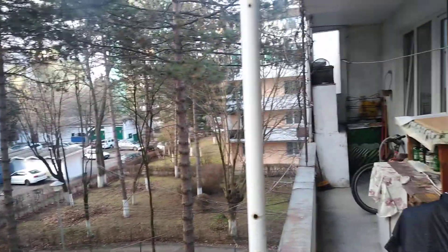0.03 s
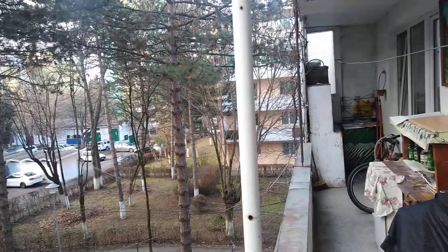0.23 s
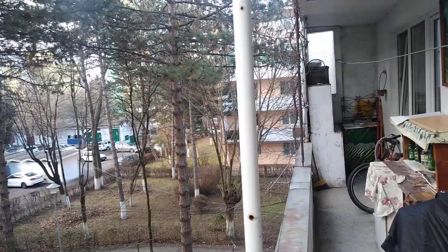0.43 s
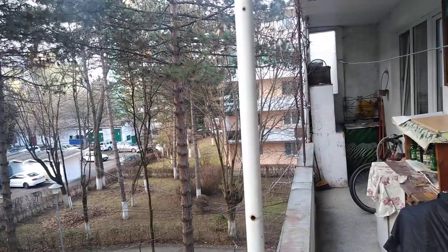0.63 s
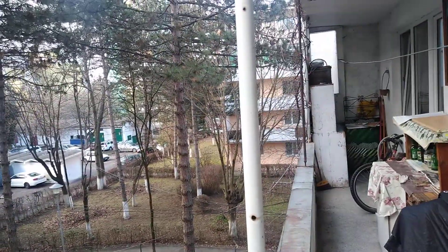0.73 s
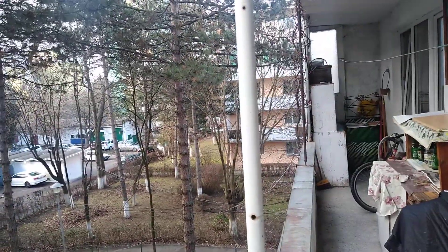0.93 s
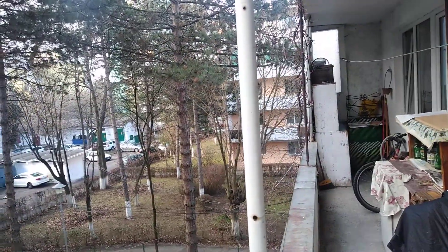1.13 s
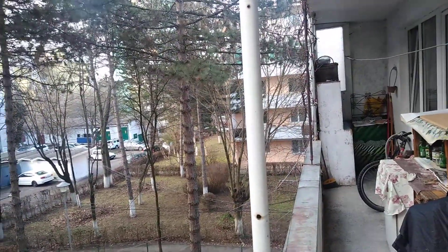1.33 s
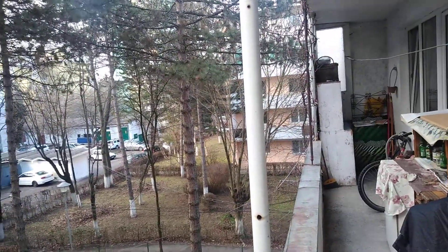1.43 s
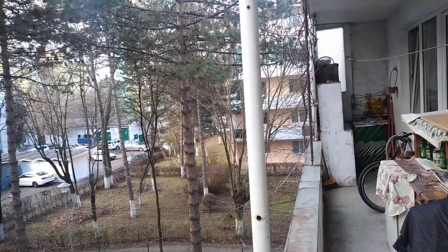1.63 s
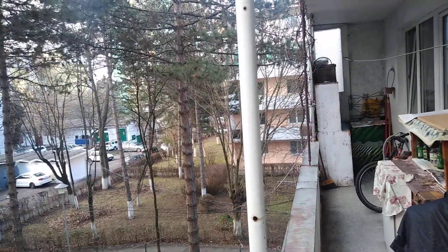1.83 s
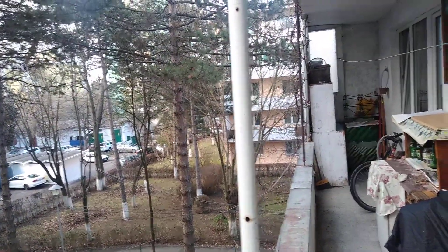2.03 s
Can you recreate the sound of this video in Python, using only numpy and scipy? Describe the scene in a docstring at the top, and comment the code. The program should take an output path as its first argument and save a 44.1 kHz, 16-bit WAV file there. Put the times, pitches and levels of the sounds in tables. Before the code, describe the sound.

Strong wind rushes through pines beside a balcony, with a faint, wavering moan underneath. Gusts bump the microphone with low thumps, and near the end a harder one hits with rumbling and sharp slaps.

```python
"""Strong wind rushes through pines beside a balcony, with a faint, wavering moan.
The rush is broadband turbulence noise; the moan is a narrow resonance that follows the air speed.
Eddies buffet the microphone with low thumps and sharp slaps, opposite in polarity in the two channels.
The hardest gust makes the recorder's limiter turn the gain down, and it recovers slowly."""
import sys
import numpy as np
from scipy import signal
from scipy.fft import rfft, irfft
from scipy.io import wavfile
from scipy.ndimage import uniform_filter1d

SR = 44100
rng = np.random.default_rng(int(sys.argv[2]) if len(sys.argv) > 2 else 0)


def int16_out(signal):
    """Quantize to a 16-bit WAV file."""
    q = np.round(np.clip(np.atleast_2d(signal).T, -1, 1) * 32767)
    wavfile.write(sys.argv[1], SR, q.astype(np.int16))


N = 92610
TIME = np.arange(N) / SR
HZ = np.fft.rfftfreq(N, 1 / SR)


def amp(db):
    """Amplitude ratio of a level in decibels."""
    return 10 ** (np.asarray(db) / 20)


def unit(x):
    """Normalisation to an rms of one."""
    return x / np.sqrt(np.mean(x ** 2) + 1e-20)


def at_frequency(points, hz):
    """Interpolation of a table on a logarithmic frequency axis."""
    points_hz, values = np.transpose(points)
    return np.interp(np.log(hz + 1), np.log(points_hz + 1), values)


def band_noise(low_hz, high_hz, order=4):
    """White noise shaped by a Butterworth band-pass magnitude response."""
    low_loss = 1 + (low_hz / (HZ + 1e-3)) ** (2 * order)
    high_loss = 1 + (HZ / high_hz) ** (2 * order)
    return unit(irfft(rfft(rng.standard_normal(N)) / np.sqrt(low_loss * high_loss), N))


def pine_rush(level_db=-38.5, roar_hz=404, needles_hz=1510, comb_hz=2140, patch_db=0.5, flutter_db=0.15):
    """Turbulence in the trees radiates broadband noise, only partly coherent at two close ports."""
    # spectrum of the rush: frequency_hz, relative_density_db
    spectrum = [(20, -47), (60, -16), (130, -1), (200, -3), (270, -2), (400, -3.5), (520, -4.5), (750, -5),
                (1000, -8.5), (1300, -10.5), (1800, -10), (2400, -13), (3000, -18.5), (3600, -24),
                (4300, -27.5), (5000, -27), (6500, -32), (8000, -33.5), (10000, -38), (12000, -43.5),
                (14000, -48.5)]
    # strength of the wind in the needles: time_s, gain_db
    wind = [(0, -0.6), (.3, 0.5), (.6, 0.1), (.9, 1), (1.2, 2.1), (1.5, 3), (1.65, 3.2), (1.83, 1),
            (2.1, 2.5)]
    # strength of the low roar: time_s, gain_db
    roar = [(0, -.5), (.55, 0.6), (1.0, 0.7), (1.5, 0.5), (1.88, 1.5), (2.1, -4.5)]
    # likeness of the channels: frequency_hz, coherence_ratio
    likeness = [(50, 0), (150, 0), (290, .7), (400, 0.35), (500, 0.66), (620, 0.81), (850, 0.85),
                (1100, 0.94), (1400, 0.52), (1700, 0.65), (2080, 0.98), (2750, 0.74), (3200, 0.74),
                (3700, 0.6), (4300, 1), (4600, 0.2), (5300, 0.27), (6000, 0.52), (9000, .28), (14000, .2)]
    # phase lead of the left channel in the low range: frequency_hz, lead_rad
    low_lead = [(50, 4.5), (180, 2), (280, -0.57), (400, -0.66), (580, 0.35), (800, -0.3), (1250, -0.55),
                (1500, 1.98), (2140, 3)]
    # balance of the channels: frequency_hz, left_minus_right_db
    balance = [(100, -9), (330, -0.5), (500, 0), (1000, 0.2), (1350, 2), (2100, 1.5), (2500, 2.5),
               (3800, 0.5), (6000, 2.5), (9000, 1), (13000, -1)]
    window, hop = 1024, 256
    frames, hz = N // hop + 5, np.fft.rfftfreq(window, 1 / SR)
    frame_s = np.arange(frames) * hop / SR
    left_re, left_im, other_re, other_im, patches = rng.standard_normal((5, frames, len(hz)))
    patches = uniform_filter1d(patches, size=14, axis=0)  # smooth in time
    patches = unit(uniform_filter1d(patches, size=12, axis=1))  # and in frequency
    flutter = unit(uniform_filter1d(rng.standard_normal(frames), size=8))[:, None]
    wind_db = np.interp(frame_s, *np.transpose(wind))[:, None]
    roar_db = np.interp(frame_s, *np.transpose(roar))[:, None]
    # the treble follows the wind, so the rush brightens as the wind grows
    swell_db = roar_db + (wind_db - roar_db) * at_frequency([(roar_hz, 0), (needles_hz, 1)], hz)
    magnitude = amp(at_frequency(spectrum, hz) + swell_db + patch_db * patches + flutter_db * flutter)
    coherence = np.clip(at_frequency(likeness, hz), 0, 1)
    high_lead = np.pi + 2 * np.pi * hz / comb_hz
    lead = np.where(hz < low_lead[-1][0], at_frequency(low_lead, hz), high_lead)
    left = left_re + 1j * left_im
    right = coherence * left + np.sqrt(1 - coherence ** 2) * (other_re + 1j * other_im)
    lean = amp(at_frequency(balance, hz) / 2)
    spectra = np.array([left * lean, right * np.exp(-1j * lead) / lean]) * magnitude
    _, rush = signal.istft(spectra.swapaxes(1, 2), nperseg=window, noverlap=window - hop)
    return amp(level_db) * unit(rush[:, :N])


def balcony_moan(width_hz=34, steadiness=0.88, lead_rad=-0.16):
    """A flow-driven resonance gives a narrow band of noise whose pitch wanders with the air speed."""
    # course of the moan: time_s, pitch_hz, level_db
    course = [(0, 387.7, -42.5), (0.061, 368.9, -45.5), (0.121, 329, -42.5), (.175, 333.4, -47),
              (.22, 342.5, -43), (.3, 347, -43.5), (.4, 330.3, -52), (.46, 341.3, -42),
              (0.531, 299.4, -46.5), (.6, 324.8, -52.5), (.67, 307.6, -41.5), (.735, 300, -54),
              (.81, 317.2, -42), (.9, 325.7, -51.5), (1.11, 328, -42.5), (1.23, 315, -49.5),
              (1.31, 338, -47), (1.462, 298, -49), (1.901, 323.3, -55), (2.1, 310, -44.5)]
    time_s, pitch_hz, level_db = np.transpose(course)
    phase = 2 * np.pi * np.cumsum(np.interp(TIME, time_s, pitch_hz)) / SR
    envelope = band_noise(0.9, width_hz / 2, order=2) + 1j * band_noise(0.97, width_hz / 2, order=2)
    tone = envelope / np.sqrt(1 + (steadiness * abs(envelope)) ** 2) * np.exp(1j * phase)
    stereo = np.array([tone, tone * np.exp(-1j * lead_rad)]).real
    return amp(np.interp(TIME, time_s, level_db)) * unit(stereo)


def buffeting(full_force_db=-4, calm_swing_db=2, evenness=3):
    """Eddies on the microphone add in power; the harder or smaller one is, the higher its rumble reaches."""
    # light turbulence between the eddies: time_s, level_db
    calm_levels = [(0, -44), (.5, -44), (1.0, -41), (1.16, -48), (1.22, -65), (1.33, -53), (1.4, -42),
                   (1.53, -52), (1.9, -30), (2.1, -36.5)]
    # eddies, the small ones lifting the upper rumble: peak_s, rise_s, fall_s, level_db, lift_db
    eddies = [(.103, 0.014, 0.011, -36.5, 5), (.211, 0.012, 0.018, -29.5, 6.5),
              (0.255, 0.0096, 0.0085, -21, 1.5), (.352, 0.029, 0.023, -31.5, 3.5),
              (0.404, 0.0067, 0.016, -20, -5), (.658, 0.013, .02, -18, -8), (0.704, 0.011, 0.013, -18, 0),
              (0.746, 0.0099, 0.013, -23.5, -5), (.822, 0.0078, 0.015, -30, 8.5),
              (.934, 0.0051, 0.012, -26, 2), (.972, 0.0098, 0.02, -32.5, 2), (1.164, 0.015, 0.012, -37, 12),
              (1.366, 0.0062, 0.0099, -27.5, -4), (1.447, .013, .013, -29.5, -4),
              (1.564, 0.0059, .006, -16, 0), (1.583, 0.0052, 0.025, -11, 2.5),
              (1.636, 0.013, 0.0087, -18.5, 6), (1.677, 0.0094, .01, -22, 2.5),
              (1.699, 0.013, 0.01, -6.5, 1.5), (1.725, .01, 0.012, -10.5, 0),
              (1.774, 0.043, 0.0051, -23, 4.5), (1.834, .011, 0.011, -13.5, 0.5),
              (1.857, .005, .009, -15.5, 1.5), (1.932, 0.016, 0.017, -26.5, 6),
              (1.979, .01, 0.0068, -22.5, -4), (2.03, .008, 0.018, -25.5, -14)]
    # bands of the turbulence: low_hz, high_hz, band_db, growth_exponent, lift_share
    bands = [(49, 116, -1, 0.89, 0.0079), (126, 204.5, -1, 1.43, 1), (250.5, 485, -14, 2, 0.5)]
    calm = amp(np.interp(TIME, *np.transpose(calm_levels)) + calm_swing_db * band_noise(1.3, 42))
    rumble = np.zeros(N)
    for low_hz, high_hz, band_db, growth_exponent, lift_share in bands:
        power = calm ** 2
        for peak_s, rise_s, fall_s, level_db, lift_db in eddies:
            width_s = np.where(TIME < peak_s, rise_s, fall_s)
            power += amp(level_db + lift_share * lift_db) ** 2 * np.exp(-((TIME - peak_s) / width_s) ** 2)
        force = np.sqrt(power) / amp(full_force_db)
        swirl = signal.hilbert(band_noise(low_hz, high_hz, order=5))
        # flatten the noise's own envelope so that the eddies shape the thumps
        swirl = unit(swirl.real / np.sqrt(1 + (evenness * abs(swirl)) ** 2))
        rumble += amp(full_force_db + band_db) * force ** growth_exponent * swirl
    return rumble


def air_slaps(width_cycles=0.45):
    """A small, fast eddy gives a bipolar pressure pulse: one push and one pull."""
    # slaps inside the hardest gust: centre_s, level_db, pitch_hz
    slaps = [(1.590, -7.5, 330), (1.601, -12.5, 563), (1.674, -5, 310), (1.684, -4.5, 327),
             (1.693, -7, 387), (1.697, -21, 770), (1.699, 0, 430.5), (1.764, -12, 295)]
    pressure = np.zeros(N)
    for centre_s, level_db, pitch_hz in slaps:
        cycles = pitch_hz * (TIME - centre_s)
        pressure -= amp(level_db) * np.sin(2 * np.pi * cycles) * np.exp(-(cycles / width_cycles) ** 2 / 2)
    return pressure


def microphone_ports(pressure, low_cut_hz=46, delay_s=0.00049, imbalance_db=1.58):
    """High-passed wind pressure drives two ports in antiphase, the left one later and weaker."""
    high_passed = irfft(rfft(pressure) / np.sqrt(1 + (low_cut_hz / (HZ + 1e-3)) ** 10), N)
    delayed = np.interp(TIME - delay_s, TIME, high_passed)
    return np.array([delayed * amp(-imbalance_db / 2), -high_passed * amp(imbalance_db / 2)])


def scene():
    """Superposition of the distant rush and moan with the wind pressure on the microphone."""
    return pine_rush() + balcony_moan() + microphone_ports(buffeting() + air_slaps())


def record(dry):
    """A limiter ducks fast and recovers slowly; saturation rounds the peaks; a low-pass ends the band."""
    threshold_db, attack_s, recovery_db_per_s = -12.5, 0.011, 9.5
    ceiling, cutoff_hz = 0.55, 14250
    power = uniform_filter1d((dry ** 2).mean(0), size=800)
    power_db = 10 * np.log10(abs(power) + 1e-12)
    recovery_db = recovery_db_per_s * TIME
    held_db = np.maximum.accumulate(power_db + recovery_db) - recovery_db  # peak hold with a steady fall
    excess_db = np.maximum(held_db - threshold_db, 0)
    pole = np.exp(-1 / (attack_s * SR))
    ducked = dry * amp(-signal.lfilter([1 - pole], [1, -pole], excess_db))
    rounded = ducked / (1 + (ducked / ceiling) ** 4) ** (1 / 4)
    low_pass = signal.firwin(511, cutoff_hz, window=("kaiser", 9), fs=SR)
    return signal.oaconvolve(rounded, low_pass[None], "same")


dry = scene()
out = record(dry)
int16_out(out)
```